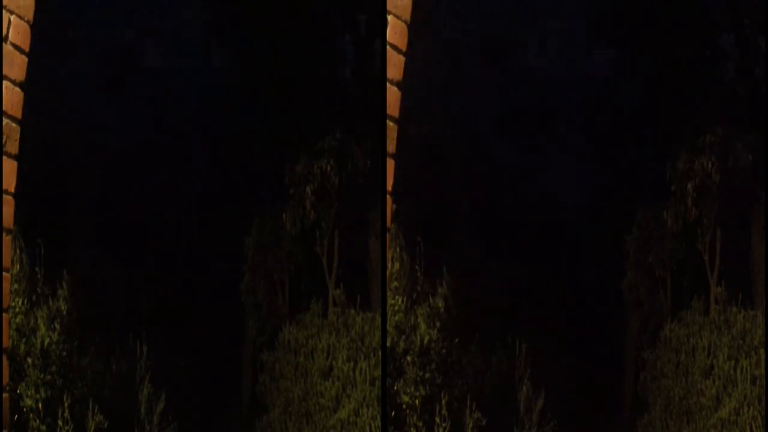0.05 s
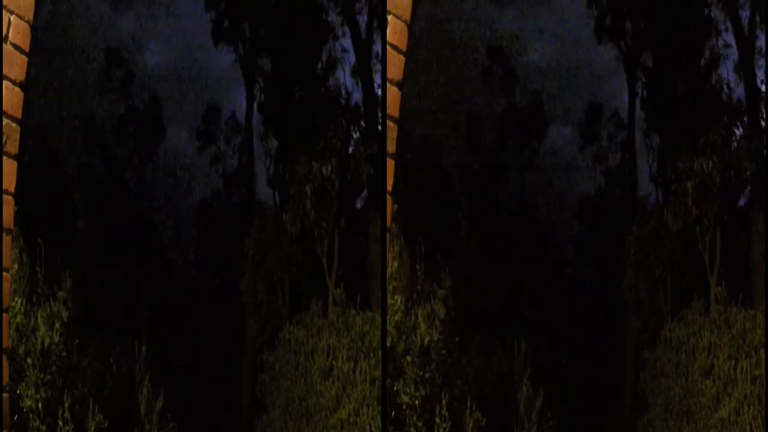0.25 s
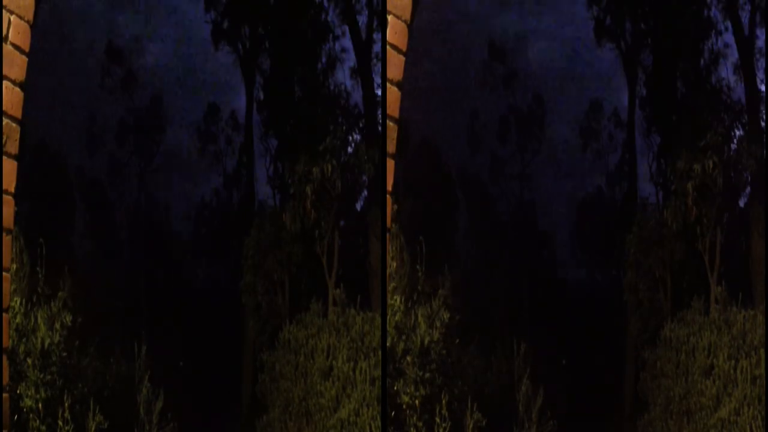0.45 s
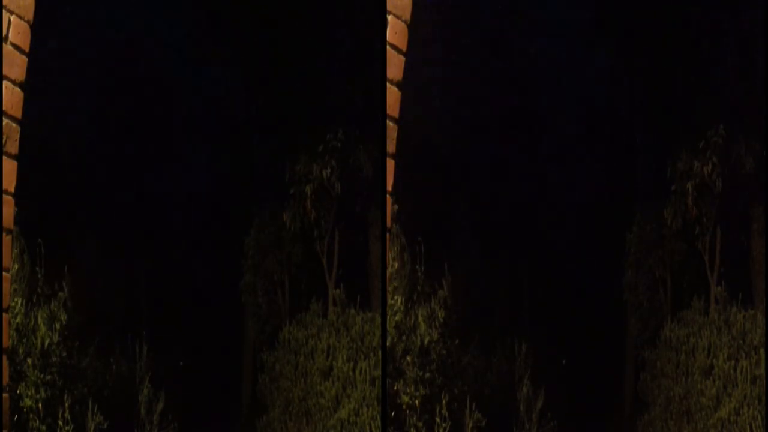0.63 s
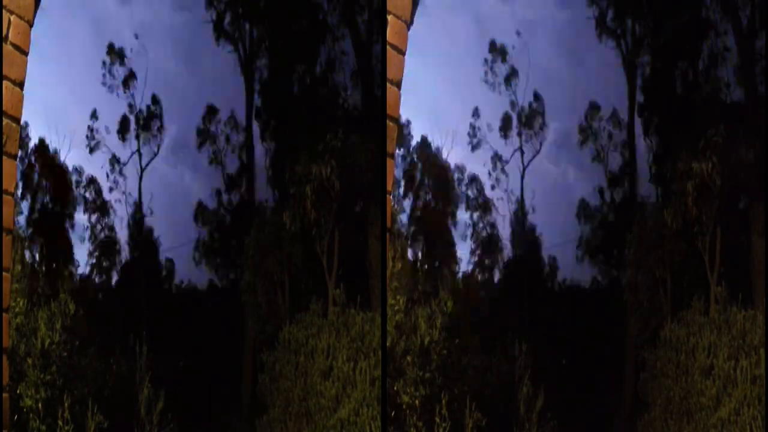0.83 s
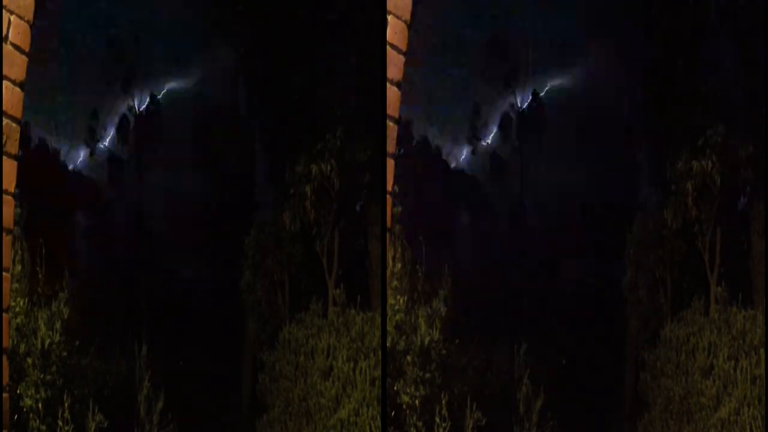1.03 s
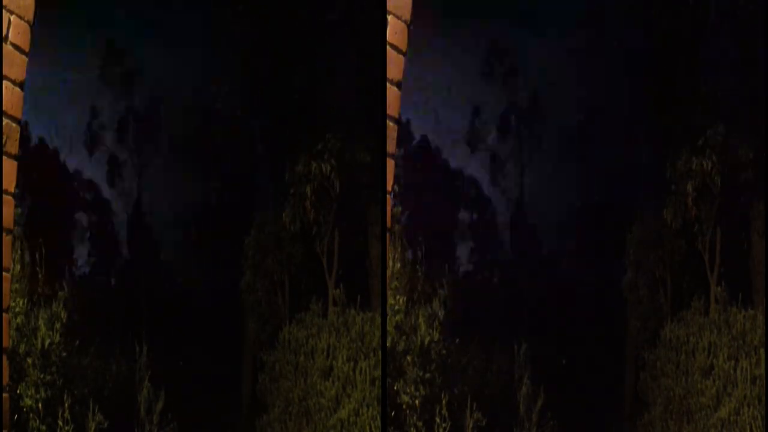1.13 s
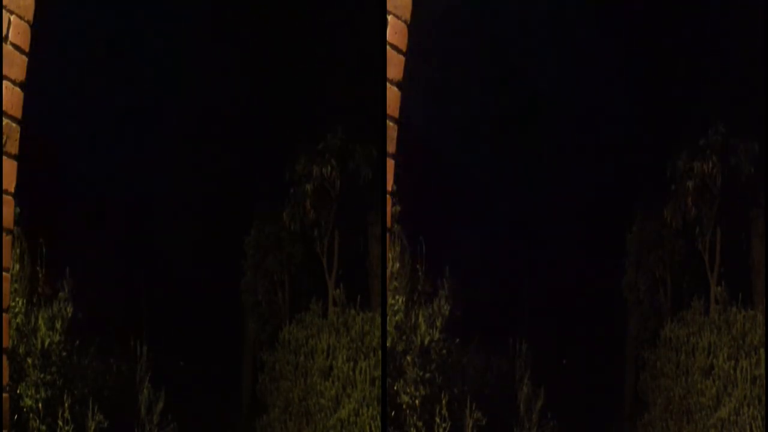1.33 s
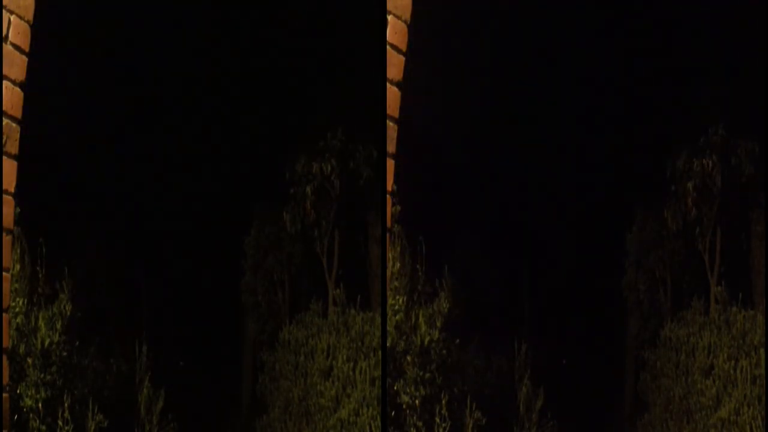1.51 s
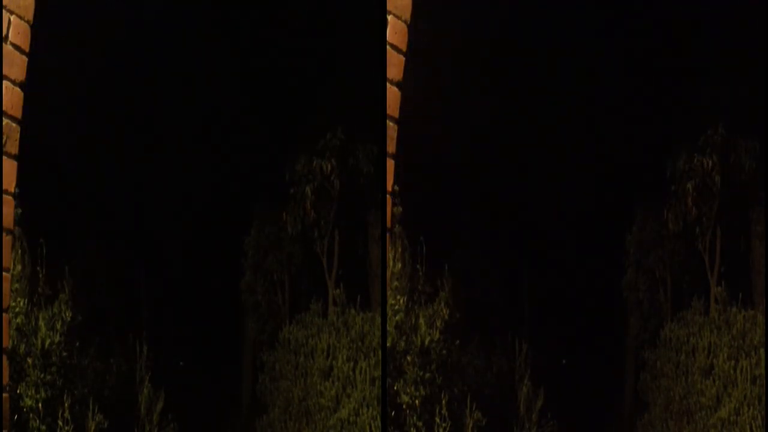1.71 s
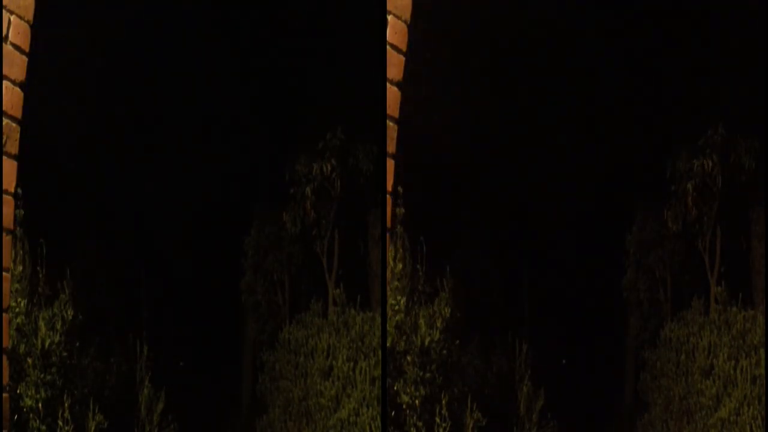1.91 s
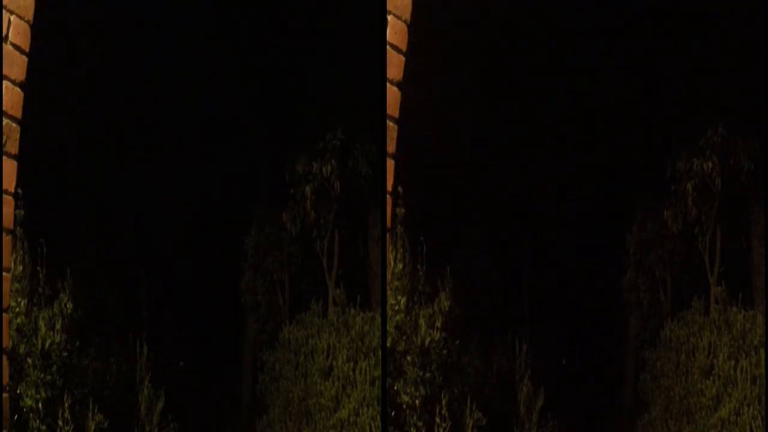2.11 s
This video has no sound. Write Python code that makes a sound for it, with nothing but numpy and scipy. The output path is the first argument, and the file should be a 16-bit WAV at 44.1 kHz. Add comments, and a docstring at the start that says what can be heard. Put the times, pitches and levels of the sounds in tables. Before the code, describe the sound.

A sudden thunderclap bursts over an outdoor storm bed of rushing wind, fine rain hiss and low distant rumble. A second strong peal comes right after, then weaker booming, clattering peals roll away.

```python
"""Beside a house wall on a stormy night.
Rain and wind hiss steadily in the background, over a low far rumble.
A sudden thunderclap of crowded shock fronts breaks in, followed by further peals that weaken
into a long roll. Each peal is a deep boom with a hollow clatter above it."""
import sys
import numpy as np
from scipy import signal
from scipy.fft import rfft, irfft
from scipy.io import wavfile
from scipy.ndimage import uniform_filter1d

SR = 44100
rng = np.random.default_rng(int(sys.argv[2]) if len(sys.argv) > 2 else 0)


def file_out(sig):
    """Save sig as 16-bit WAV at sys.argv[1]."""
    # one column per channel
    cols = np.atleast_2d(sig).T
    # limit, then scale
    lim = np.clip(cols, -1, 1)
    pcm = np.round(lim * 32767).astype(np.int16)
    wavfile.write(sys.argv[1], SR, pcm)


N = 94815


def from_db(db):
    """Decibels to gain."""
    return 10 ** (np.asarray(db) / 20)


def unit_rms(x):
    """Scale to rms 1."""
    return x / np.sqrt(np.mean(x ** 2) + 1e-20)


def ring(colour, size=8192):
    """The sound of one impulse with the given tone colour; peak 1."""
    hz, db = np.transpose(colour)
    bin_hz = np.maximum(np.arange(size // 2 + 1) * SR / size, 1)
    gain = from_db(np.interp(np.log(bin_hz), np.log(hz), db))
    cepstrum = irfft(np.log(gain))
    cepstrum[1:size // 2] *= 2   # minimum phase keeps the attack sharp
    cepstrum[size // 2 + 1:] = 0
    pulse = irfft(np.exp(rfft(cepstrum)))
    return pulse / np.abs(pulse).max()


def patter(colour, per_s, spread_db):
    """Random impulses of uneven size, all ringing with one colour; rms 1."""
    pulse = ring(colour)
    n = N + len(pulse) - 1
    sizes = from_db(spread_db * rng.standard_normal(n)) * rng.choice([-1, 1], n)
    hits = rng.random(n) < per_s / SR
    return unit_rms(signal.fftconvolve(sizes * hits, pulse, "valid"))


def noise(colour):
    """Smooth noise of one colour; rms 1."""
    pulse = ring(colour)
    white = rng.standard_normal(N + len(pulse) - 1)
    return unit_rms(signal.fftconvolve(white, pulse, "valid"))


def drift(hz):
    """Slow random wander; rms 1."""
    pole = np.exp(-2 * np.pi * hz / SR)
    wander = signal.lfilter([1], [1, -2 * pole, pole * pole], rng.standard_normal(N + SR))
    return unit_rms(wander[SR:])


def evened(x, window_s=0.027, amount=0.77):
    """Compress the chance swells of a dense texture; rms 1."""
    width = int(window_s * SR)
    power = uniform_filter1d(uniform_filter1d(x ** 2, width), width)
    return unit_rms(x / (power + 1e-9) ** (amount / 2))


def swell(start, rise, hold, t60):
    """Envelope with a straight rise, a hold and an exponential tail; times in seconds."""
    t = np.arange(N) / SR - start
    tail = np.exp(-np.log(1000) * np.maximum(t - rise - hold, 0) / t60)
    return np.clip(t / rise, 0, 1) * tail


# The rumble's dark tone. Each row: frequency in Hz, relative level in dB.
RUMBLE_COLOUR = [(12, -6.5), (28, -0.5), (48, 1.5), (66, -3.5), (95, 1.5), (190, -1.5), (280, -9.5),
                 (360, -22), (600, -40.5), (1500, -68), (8000, -100)]

def far_rumble():
    """The distant storm lays down an even bed of low noise."""
    return from_db(-29) * evened(noise(RUMBLE_COLOUR))


# The wind's midrange rush. Each row: frequency in Hz, relative level in dB.
WIND_COLOUR = [(200, -25.5), (380, -18.5), (470, -12), (560, -6), (740, 0), (830, -3), (950, -11.5),
               (1150, -13.5), (1550, -16.5), (1880, -13), (2200, -17.5), (2600, -29.5), (3100, -31),
               (3600, -48.5), (6000, -63), (12000, -95)]

def wind():
    """Wind in the trees, its level fluttering slightly with small gusts."""
    gust_db = 0.55 * drift(hz=8.9)
    return from_db(-29 + gust_db) * noise(WIND_COLOUR)


# The bright tick of a drop. Each row: frequency in Hz, relative level in dB.
DROP_COLOUR = [(1000, -7.5), (3500, 1.5), (4500, -4.5), (5200, -2), (5700, -5.5), (6150, 2.5), (7000, -5.5),
               (7600, -7), (8000, -4), (9200, -10.5), (9900, -11.5), (11300, -21.5), (13000, -16),
               (15000, -34)]

def rain():
    """Thousands of tiny drop impacts blur into a fine hiss."""
    return from_db(-51) * patter(DROP_COLOUR, per_s=15000, spread_db=2)


# The thunder's peals. Each row: start in seconds, rise in seconds, hold in seconds,
# seconds to fall by 60 dB, boom level in dB, clatter level in dB.
PEAL_CUES = [(0.203, .025, .030, 1, -29, -30.5), (0.298, 0.025, .052, 0.44, -10.5, -15.5),
             (0.47, .018, 0.038, 0.85, -20, -18), (.615, 0.057, 0.065, 0.75, -15, -20),
             (0.673, 0.016, 0.031, 0.16, -16, -13.5), (.960, .020, 0.051, 0.52, -20.5, -21),
             (1.268, 0.018, 0.018, .50, -27, -36.5), (1.360, .030, 0.043, 1, -33, -28.5),
             (1.668, 0.0084, 0.011, 0.1, -42.5, -27.5), (1.798, 0.013, 0.036, 0.1, -31, -32.5)]

def rolling_peals(colour, layer, roll_db):
    """Crowded shock fronts swell with each peal and with the long roll that the clap sets off."""
    roll = from_db(roll_db) * swell(start=0.29, rise=0.08, hold=0.44, t60=6.0)
    power = roll ** 2
    for start, rise, hold, t60, *levels_db in PEAL_CUES:
        peal = from_db(levels_db[layer]) * swell(start, rise, hold, t60)
        power += peal ** 2
    crowd = evened(patter(colour, per_s=2200, spread_db=2.5))
    return np.sqrt(power) * crowd


# The strongest shock fronts. Each row: start in seconds, boom peak in dB, clatter peak in dB.
SHOCK_CUES = [(.310, -20, -7), (.329, -2, -5.5), (.354, -4.5, -16.5), (.383, -2.5, -18), (.421, -22, -7),
              (.658, -8, -19), (.679, -17, -16), (.706, -13.5, -4), (.798, -23, -13.5)]

def single_shocks(colour, layer):
    """Lone shock fronts punch through the crowd, one impulse each."""
    fronts = np.zeros(N)
    for start, *peaks_db in SHOCK_CUES:
        fronts[int(start * SR)] += from_db(peaks_db[layer])
    return signal.fftconvolve(fronts, ring(colour))[:N]


# The low and mid tones of a shock front. Each row: frequency in Hz, relative level in dB.
BOOM_COLOUR = [(12, -26.5), (25, -5), (47, 2), (64, -4.5), (92, 0.5), (128, -2), (180, 1.5), (250, -3.5),
               (310, -14.5), (370, -23.5), (600, -37.5), (1500, -82), (8000, -115)]
CLATTER_COLOUR = [(200, -38), (380, -20), (490, -5), (620, 0), (740, -1.5), (900, -16), (1200, -25.5),
                  (1700, -30.5), (2400, -44.5), (4000, -67), (12000, -105)]

def thunder():
    """A deep boom layered with a hollow clatter, both driven by the same peals and shocks."""
    low, mid = 0, 1   # which level column of the cues each layer plays
    boom = rolling_peals(BOOM_COLOUR, low, roll_db=-23.5) + single_shocks(BOOM_COLOUR, low)
    clatter = rolling_peals(CLATTER_COLOUR, mid, roll_db=-25.5) + single_shocks(CLATTER_COLOUR, mid)
    return boom + clatter


def scene():
    """Thunder over the steady storm, in mono."""
    return (thunder() + far_rumble() + wind() + rain())[None]


def record(dry):
    """A soft clip rounds the highest peaks, then a steep low-pass trims the top."""
    ceiling, hardness, cutoff_hz = 0.96, 7.9, 15300
    rounded = dry / (1 + np.abs(dry / ceiling) ** hardness) ** (1 / hardness)
    lowpass = signal.ellip(10, 0.1, 80, cutoff_hz, fs=SR, output="sos")
    return signal.sosfilt(lowpass, rounded)


dry = scene()
out = record(dry)
file_out(out)
```